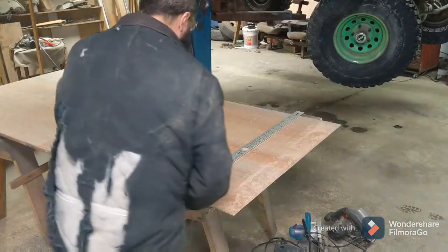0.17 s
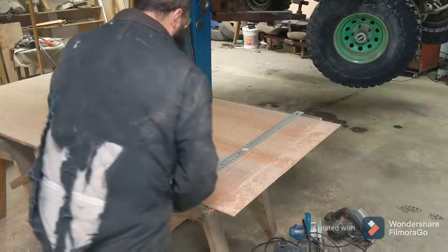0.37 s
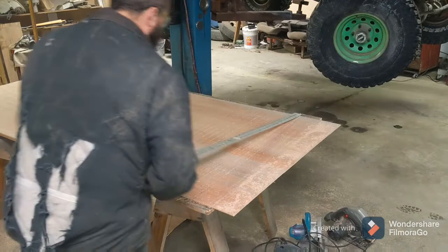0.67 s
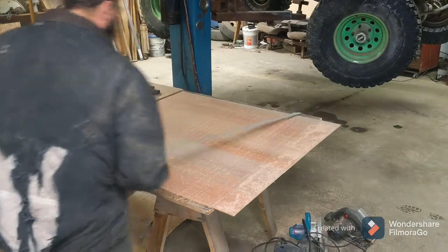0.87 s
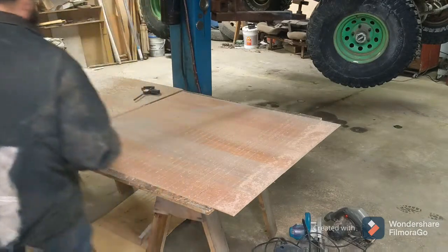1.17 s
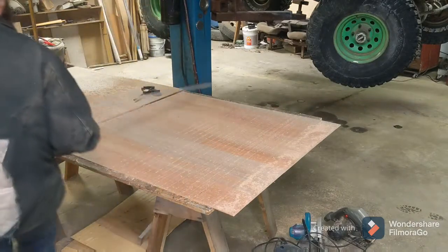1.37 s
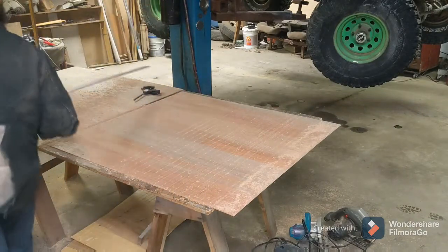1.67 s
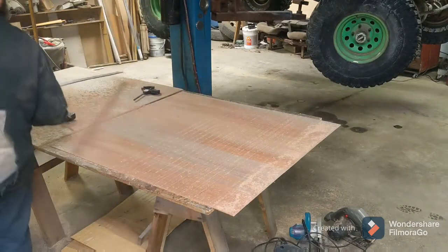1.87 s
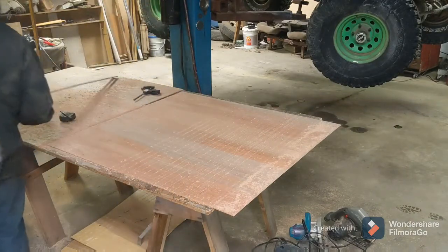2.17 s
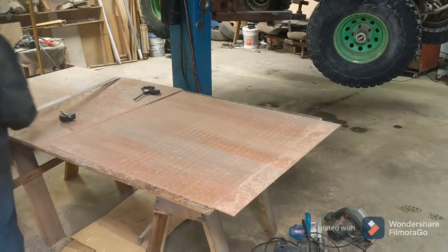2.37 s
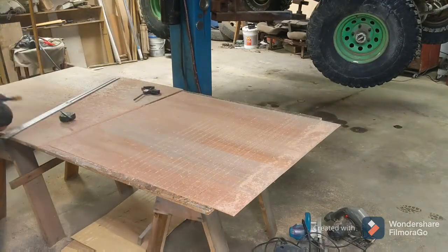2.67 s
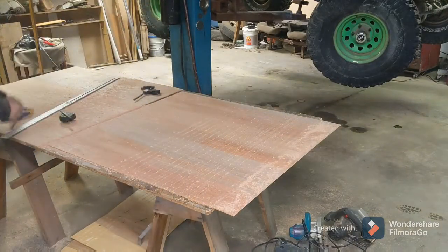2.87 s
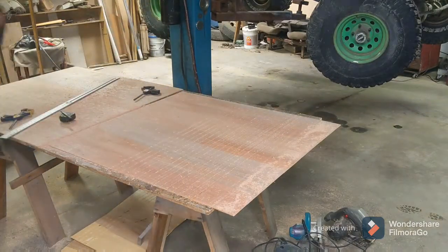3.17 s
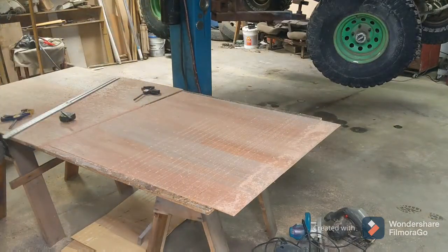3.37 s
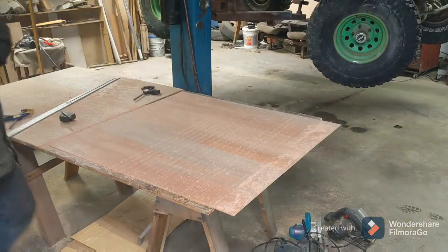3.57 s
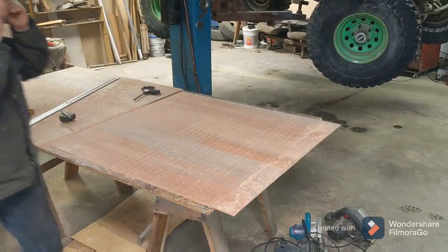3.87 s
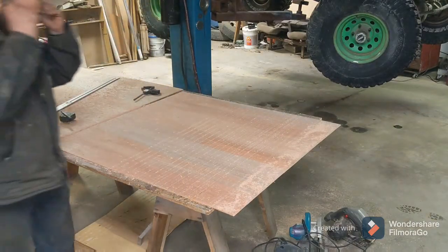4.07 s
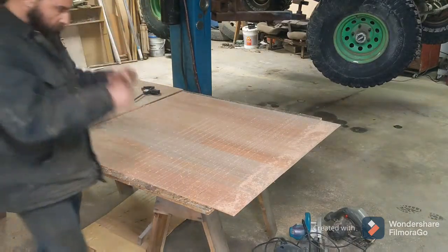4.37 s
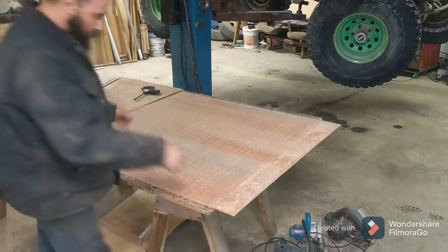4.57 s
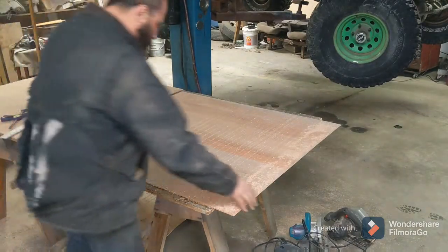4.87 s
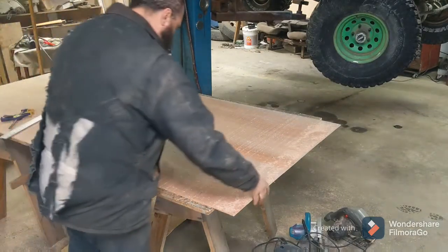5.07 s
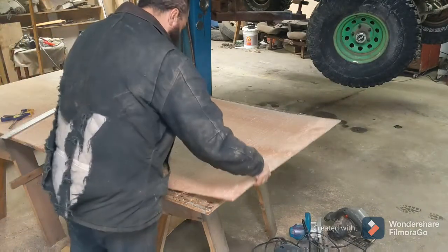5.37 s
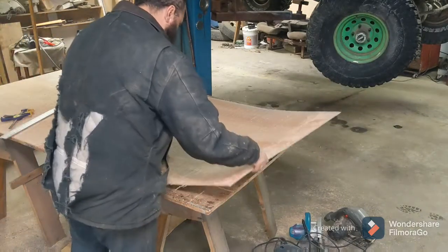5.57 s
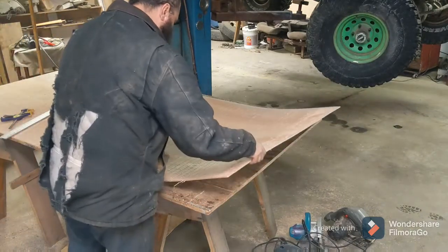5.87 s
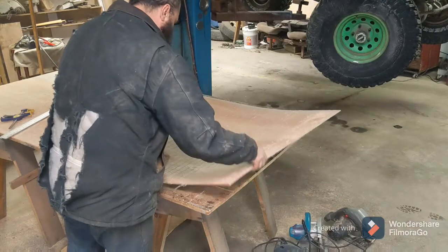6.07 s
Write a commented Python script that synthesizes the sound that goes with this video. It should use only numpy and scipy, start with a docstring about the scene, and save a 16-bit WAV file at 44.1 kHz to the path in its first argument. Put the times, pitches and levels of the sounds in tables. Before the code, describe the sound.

In a reverberant workshop, tools knock down on plywood, a metal straightedge drops with a loud clatter, then wood scrapes jerkily and splinters briefly.

```python
"""Plywood sheet on sawhorses

A thin plywood sheet lies in a workshop. A long metal square is dragged off it, tools are set down, and the
square drops on the far end with a clatter; shoes and sleeves scuff by. Then the gripped sheet scrapes in jerks
and crackles as it bends, over a faint hum. Knocks are filtered pulses with noise rings and bending modes, clatter
is random touches ringing metal modes, friction is coloured grains; all but the air and the hum get echoes and reverb.
"""
import sys
import numpy as np
from scipy import signal
from scipy.fft import rfft, irfft
from scipy.io import wavfile

SR = 44100
rng = np.random.default_rng(int(sys.argv[2]) if len(sys.argv) > 2 else 0)


def wav_out(sig):
    """Save sig, one row per channel (or a flat mono array), as 16-bit PCM at SR to the path in sys.argv[1]."""
    wavfile.write(sys.argv[1], SR, np.round(np.clip(np.atleast_2d(sig).T, -1, 1) * 32767).astype(np.int16))


N = 273596
TIME = np.arange(N) / SR
RING_TIME = TIME[:SR * 3 // 4]

# jerks of the gripped sheet, an edge knock and a rasp each: (t/s, knock level/dB, rasp level/dB)
TUGS = [(4.995, -3.5, -29.5), (5.031, -2.5, -34.5), (5.071, -8, -31.5), (5.139, -1, -30.5),
        (5.168, -5, -31), (5.211, -1, -35), (5.265, -9, -39)]


def from_db(db):
    """Decibels to gain."""
    return 10 ** (np.asarray(db) / 20)


def unit_energy(x):
    """Scale so that the squares of a channel sum to one, on average over the channels."""
    return x / np.sqrt(np.mean(np.sum(x ** 2, axis=-1)) + 1e-20)


def at_hz(points, hz):
    """Read a table on a log-frequency axis."""
    f, value = np.transpose(points)
    return np.interp(np.log(np.maximum(hz, 1)), np.log(f), value)


def add(track, s, sound):
    """Mix a sound into a track from time s on."""
    start = max(round(s * SR), 0)
    track[start:start + len(sound)] += sound[:N - start]


def colour(x, points, tilt_db=0, size=4096):
    """Causal (minimum-phase) filter that follows a spectrum, tilted per octave above 1 kHz."""
    hz = np.maximum(np.fft.rfftfreq(size, 1 / SR), 1)
    octaves = np.log2(np.maximum(hz, 1000) / 1000)
    cepstrum = irfft(np.log(from_db(at_hz(points, hz) + tilt_db * octaves)))
    # folding the cepstrum forward gives minimum phase
    cepstrum[1:size // 2] *= 2
    cepstrum[size // 2 + 1:] = 0
    impulse = irfft(np.exp(rfft(cepstrum)))
    return signal.oaconvolve(x, impulse)[:len(x)]


def dying(t60):
    """Envelope that loses 60 dB in t60 seconds."""
    return np.exp(-np.log(1000) * RING_TIME / t60)


def ring(modes, spread_db):
    """Struck modes decay as sines; their random strengths stand for where the blow lands."""
    gains = from_db(spread_db * rng.standard_normal(len(modes))) * rng.choice([-1, 1], len(modes))
    total = np.zeros(len(RING_TIME))
    for gain, (hz, db, t60) in zip(gains, modes):
        total += gain * from_db(db) * dying(t60) * np.sin(2 * np.pi * hz * RING_TIME)
    return unit_energy(total)


def grains(per_s, spread_db, size):
    """Tiny random contacts of uneven strength, rms 1."""
    excess = np.minimum(rng.exponential(1, size), 4)   # capped so that no grain sticks out
    strength = from_db(spread_db * excess) * rng.choice([-1, 1], size)
    happens = rng.random(size) < per_s / SR
    return unit_energy(strength * happens) * np.sqrt(size)


def stroke(start_s, length_s, level_db, swell_db, attack_s, fade_s):
    """Envelope of a push: it gets going, swells or slackens while it lasts, then fades."""
    t = TIME - start_s
    held = from_db(level_db + swell_db * np.clip(t / length_s, 0, 1))
    return held * np.clip(t / attack_s, 0, 1) * np.exp(-np.maximum(t - length_s, 0) / fade_s)


def diffuse(size):
    """White stereo noise arriving from all sides: alike in the bass, nearly unrelated in the top treble."""
    # left-right likeness: (f/Hz, correlation)
    likeness = [(140, 0.98), (260, 0.43), (600, 0.072), (1100, 0.26), (2000, 0.027), (16000, -0.061)]
    alike = np.clip(at_hz(likeness, np.fft.rfftfreq(size, 1 / SR)), -1, 1)
    mid, side = rfft(rng.standard_normal((2, size)))
    left_right = np.sqrt((1 + alike) / 2) * mid + np.sqrt((1 - alike) / 2) * side * [[1], [-1]]
    return irfft(left_right, size)


def workshop(build_s, count=16):
    """Stereo reverberation that builds up quickly and dies band by band."""
    # reverberation time of the workshop: (f/Hz, t60/s)
    room_t60 = [(100, 0.62), (300, 0.58), (1000, 0.37), (3000, 0.48), (6000, 0.51), (10000, 0.33),
                (16000, 0.26)]
    size = len(RING_TIME)
    field, hz = rfft(diffuse(size)), np.fft.rfftfreq(size, 1 / SR)
    edges, tail = np.r_[0, np.geomspace(100, SR / 2, count)], 0
    for low, high in zip(edges, edges[1:]):
        band = irfft(field * ((hz >= low) & (hz < high)), size)
        envelope = dying(at_hz(room_t60, (low + high) / 2)) * (1 - np.exp(-RING_TIME / build_s))
        tail = tail + unit_energy(band * envelope) * np.sqrt(high - low)   # equal power per Hz
    return unit_energy(tail)


def place(x, room, wet_db, lag_s):
    """Direct sound and early echoes, lagging by lag_s on the right, plus reverb in a level-balanced mix."""
    # early echoes off floor, wall and ceiling: (delay/s, level/dB)
    echoes = [(.0048, -14), (0.0131, -18.5), (0.029, -11)]
    near = x + sum(from_db(db) * np.interp(TIME - delay_s, TIME, x, left=0) for delay_s, db in echoes)
    direct = np.array([near, np.interp(TIME - lag_s, TIME, near)])
    wet = from_db(wet_db)
    reverb = signal.oaconvolve(x[None], room, axes=1)[:, :N]
    return (direct + wet * reverb) / np.hypot(1, wet)


def spread_out(source, rooms, wet_db, lag_s):
    """A long object sounds from several spots: fresh draws of it, each through its own reverberation."""
    return sum(place(source(), room, wet_db, lag_s) for room in rooms) / np.sqrt(len(rooms))


def background(air_db=-52, hum_db=-64.5, hum_hz=120):
    """Low rumble and soft hiss as coloured diffuse noise, with mains hum as one steady sine."""
    # the quiet workshop: (f/Hz, density/dB per Hz)
    air_colour = [(15, -3.5), (30, 5), (50, -4.5), (76, -2), (100, -15.5), (155, -10.5), (200, -15),
                  (300, -15), (800, -18.5), (2100, -24), (4000, -20), (8000, -34.5), (12000, -39.5),
                  (16000, -40)]
    air = np.array([colour(side, air_colour) for side in diffuse(N)])
    air = unit_energy(air) * np.sqrt(N)   # rms 1
    hum = np.sqrt(2) * np.sin(2 * np.pi * hum_hz * TIME)
    return from_db(air_db) * air + from_db(hum_db) * hum


def scuffs(skew=0.3, hiss_db=1, hiss_q=1.7):
    """A sole or sleeve brushes past: grains with a broad hiss peak, swelling quickly and fading."""
    # shoes and sleeves brushing: (t/s, length/s, level/dB, tilt/dB per octave, hiss centre f/Hz)
    brushes = [(0.114, 0.067, -41.5, 0.5, 5330), (0.741, 0.56, -59, 6, 5700),
               (1.675, 0.15, -52.5, -1.5, 8500), (2.475, 0.12, -49.5, 1, 6000),
               (4.019, 0.068, -45.5, 0, 6700), (4.269, 0.2, -49.5, -1.5, 4400),
               (4.651, 0.16, -43, 0, 12600)]
    # brushing sole: (f/Hz, density/dB per Hz)
    sole = [(100, -3), (330, 14.5), (900, 10), (1900, -3), (3600, 13), (6500, 4.5), (9000, -3), (13000, -4),
            (16000, -19)]
    out = np.zeros(N)
    for s, length_s, level_db, tilt_db, hiss_hz in brushes:
        grit = colour(grains(6000, 2.7, size=len(RING_TIME)), sole, tilt_db)
        hiss = signal.lfilter(*signal.iirpeak(hiss_hz, hiss_q, fs=SR), grit)
        grit = grit + from_db(hiss_db) * hiss
        swell = np.sin(np.pi * np.minimum(RING_TIME / length_s, 1) ** skew)
        add(out, s, from_db(level_db) * unit_energy(grit) * np.sqrt(len(grit)) * swell)
    return out


def rub(envelope, spectrum, per_s, spread_db):
    """Friction: a stream of small slips heard through the rubbed body."""
    slips = colour(grains(per_s, spread_db, size=N), spectrum)
    return envelope * unit_energy(slips) * np.sqrt(N)


def scrapes():
    """The square hisses over the veneer; the dragged sheet rasps in coarse slips with fine grit on top."""
    # pushes of the square over the sheet: (t/s, length/s, level/dB, swell over the push/dB)
    pushes = [(0.098, 0.071, -47.5, -3), (0.193, 0.1, -51.5, 11), (0.702, 0.48, -53.5, -9),
              (1.199, 0.032, -50, -0.5), (2.654, .1, -47.5, 3)]
    # square on veneer: (f/Hz, density/dB per Hz)
    veneer = [(200, -15), (600, 1), (950, 3), (1900, -2), (3400, 2.5), (5700, -2.5), (8000, -13.5),
              (12000, -20), (16000, -21)]
    # coarse rasp of the sheet: (f/Hz, density/dB per Hz)
    rasp_colour = [(60, -23), (140, -3), (300, -19), (480, 7.5), (650, -7), (900, 7.5), (1150, -1),
                   (1500, 4.5), (2100, -10), (4000, -17.5), (9000, -70)]
    # grit under the sheet: (f/Hz, density/dB per Hz)
    grit_colour = [(300, -31), (1400, -5), (2600, 7.5), (4000, 5.5), (5500, -1.5), (8000, -13.5),
                   (11000, -27.5), (15000, -37.5)]
    gentle = dict(attack_s=0.015, fade_s=0.031)
    slide = sum(stroke(*push, **gentle) for push in pushes)
    rasp = sum(stroke(s, .012, db, 0, attack_s=0.0045, fade_s=0.022) for s, _, db in TUGS)
    # a hiss of grit during the tugs, and a faint rub that slackens and outlasts them
    grit = stroke(5.08, 0.18, level_db=-31.5, swell_db=-0.5, attack_s=0.028, fade_s=0.024)
    lift = stroke(4.995, .43, level_db=-44, swell_db=-13, **gentle)
    hiss = rub(slide, veneer, 5000, 2.06)
    return hiss + rub(rasp, rasp_colour, 900, 3.5) + rub(np.hypot(grit, lift), grit_colour, 4000, 5.6)


def crackles():
    """Fibres snap in short, bright showers of grains that die away."""
    # wood fibres letting go as the sheet bends: (t/s, level/dB, decay time/s)
    showers = [(5.814, -9, 0.0016), (5.825, -4.5, 0.025), (5.853, -9, 0.011)]
    # splintering wood: (f/Hz, density/dB per Hz)
    splinter = [(200, -36), (1100, -27), (2550, -20), (3200, -1.5), (3800, 2.5), (4600, -3.5),
                (7000, -10.5), (9500, -16.5), (12000, -25), (16000, -34)]
    out = np.zeros(N)
    for s, level_db, decay_s in showers:
        snaps = grains(600, 5.0, size=len(RING_TIME)) * np.exp(-RING_TIME / decay_s)
        add(out, s, from_db(level_db) * unit_energy(colour(snaps, splinter)))
    return out


def clatters(ring_db=-14, first_touch_db=-15):
    """Metal lands, then buzzes on the wood in random, dwindling touches that set its modes ringing."""
    # metal chattering on the wood: (t/s, level/dB, chatter decay/s, tilt/dB per octave, top f/Hz)
    landings = [(.302, 10, 0.0062, 4, 8500), (.601, -10.5, 0.01, 2.5, 9000),
                (0.7147, -11, 0.0024, 3, 14000), (2.178, -16, .004, 5, 15000),
                (2.229, -7, 0.0082, -3.5, 12000), (2.413, -10.5, .013, -0.5, 12000),
                (2.774, -1, .01, 3, 13000), (2.813, 0.5, .0044, 2, 15000), (3.044, 11, 0.0023, -3, 15000),
                (3.08, 18, 0.0028, -1.5, 13000), (3.09, 18.5, 0.031, -2.5, 11900),
                (3.85, -20, 0.0031, -4, 6160)]
    # ring of the metal square: (f/Hz, level/dB, t60/s)
    square_modes = [(897, -9, .25), (963, 23, 0.24), (1080, -6, .15), (1145, -22, 0.6), (1150, -17, 0.13),
                    (1403, 23.5, 0.076), (2166, 6, .25), (2440, 20, 0.083), (2744, -27, 0.28),
                    (2940, -30, 0.23), (3230, -41, 0.088), (3490, 4, 0.22), (4110, -49, 0.13),
                    (4280, 3.5, 0.083), (4850, 8, 0.26), (5600, -9, 0.27), (6090, -23, 0.18)]
    # metal on wood: (f/Hz, density/dB per Hz)
    metal_colour = [(200, -37), (900, -23), (1800, -5.5), (2700, 0.5), (4000, 4), (5500, -2.5),
                    (7500, -10.5), (10000, -17), (15000, -23)]
    out = np.zeros(N)
    for s, level_db, chatter_s, tilt_db, top_hz in landings:
        touches = unit_energy(grains(900, 5.0, size=len(RING_TIME)) * np.exp(-RING_TIME / chatter_s))
        touches[0] += from_db(first_touch_db)
        ringing = signal.fftconvolve(touches, ring(square_modes, spread_db=10.0))[:len(touches)]
        buzz = unit_energy(colour(touches, metal_colour, tilt_db))
        ringing = unit_energy(colour(ringing, metal_colour, tilt_db))
        top = signal.butter(2, top_hz, fs=SR, output="sos")
        sound = signal.sosfilt(top, buzz + from_db(ring_db) * ringing)
        add(out, s, from_db(level_db) * unit_energy(sound))
    return out


def tap(s, db, hz):
    """A soft contact: its cut-off follows its pitch and its boom follows its strength."""
    cut_per_pitch, ring_db, boom_below_db, boom_hz = 1.83, -1, -3.5, 198
    return s, db, cut_per_pitch * hz, hz, ring_db, db + boom_below_db, boom_hz


def edge_knock(s, db, hz):
    """A hard edge meets the wood: a fixed cut-off, a stronger after-ring and little boom."""
    cut_hz, ring_db, boom_below_db, boom_hz = 2070, 2, -10.5, 200
    return s, db, cut_hz, hz, ring_db, db + boom_below_db, boom_hz


def knocks(slap_s=.016, edge_hz=1070, bounce_db=-3, bounce_loss_db=8, bounce_hz=910):
    """Every contact as (t/s, clack/dB, cut-off f/Hz, spot f/Hz, after-ring/dB, boom/dB, boom f/Hz)."""
    # hard things landing on the sheet: (t/s, clack level/dB, contact cut-off f/Hz, struck spot f/Hz,
    # after-ring level/dB, boom level/dB, boom centre f/Hz, slap level/dB, slap f/Hz)
    blows = [(.303, 2, 1500, 247, 12.5, 0.5, 148, -4, 280),
             (.600, -8.5, 2400, 2240, 6, -1.5, 161.6, -4, 412),
             (2.228, 0, 1600, 970, 1, -3.5, 150, -13, 348),
             (2.413, -7, 1385, 920, -2.5, -5, 130, -16.5, 483),
             (2.7758, 10, 1090, 527, 5.5, 4, 300, 9.5, 310), (2.784, 9, 1640, 1380, -1, 16, 145, 2.5, 655),
             (2.838, 2.5, 1100, 790, -2.5, 3.5, 130, -10, 300),
             (3.043, 10, 1500, 955, 16, -0.5, 300, -3.5, 900),
             (3.081, 15, 2200, 845, 2.5, 9.5, 164, 10.5, 1350)]
    # soft taps and thuds, of hands on the sheet and a footstep: (t/s, level/dB, f/Hz)
    soft_thuds = [(.110, -11.5, 420), (.1596, -11, 500), (.198, -19.5, 280), (1.012, -23, 210),
                  (1.029, -17, 219), (2.494, -13.5, 336), (4.021, -21, 250), (4.656, -17.5, 303),
                  (4.852, -14.5, 417)]
    # the dropped square rocking to rest: (t/s)
    bounces = [3.22, 3.285, 3.411]
    # small dry ticks of the wood: (t/s, level/dB)
    ticks = [(3.851, -23.5), (5.817, -23)]
    rows = []
    for s, *blow, slap_db, slap_hz in blows:
        # after a blow the sheet slaps back on the board below
        rows += [(s, *blow), tap(s + slap_s, slap_db, slap_hz)]
    rows += [tap(*row) for row in soft_thuds]
    # each bounce is weaker than the last
    rows += [edge_knock(s, bounce_db - bounce_loss_db * k, bounce_hz) for k, s in enumerate(bounces)]
    return rows + [edge_knock(s, db, edge_hz) for s, db, *_ in TUGS + ticks]


def booms(swell_s=0.0099, narrow_db=7):
    """Slow bending waves follow each contact; where it lands decides which modes answer most."""
    # bending modes of the sheet: (f/Hz, level/dB, t60/s)
    sheet_modes = [(52, -9, 0.71), (72.9, -6.5, 0.43), (120, 4, 0.27), (144.3, 7, 0.075), (172, 0.5, 0.092),
                   (180.4, -4, 0.22), (217.3, -3.5, 0.2), (260.6, 2.5, 0.19), (303.5, 12, 0.064),
                   (324, -16.5, 0.044), (373, -38, 0.11), (470, -2.5, 0.15), (516, 24.5, 0.043)]
    out = np.zeros(N)
    for s, *_, boom_db, boom_hz in knocks():
        # modes answer less the further they lie from the boom's centre
        answering = [(hz, db - narrow_db * np.log2(hz / boom_hz) ** 2, t60) for hz, db, t60 in sheet_modes]
        boom = ring(answering, spread_db=3.0) * (1 - np.exp(-RING_TIME / swell_s))
        add(out, s, from_db(boom_db) * unit_energy(boom))
    return out


def clacks(clack_t60=0.072, spot_db=6, spot_q=4):
    """A pulse, and decaying noise for the crowded, quickly damped upper modes of the struck wood."""
    # clack of the wood: (f/Hz, density/dB per Hz)
    clack_colour = [(60, -13.5), (150, -3), (300, -1), (550, -0.5), (900, 0), (1500, -0.5), (2000, -4.5),
                    (3500, -1), (9000, -18)]
    out = np.zeros(N)
    for s, clack_db, contact_hz, spot_hz, ring_db, _, _ in knocks():
        upper = from_db(ring_db) * unit_energy(rng.standard_normal(len(RING_TIME)) * dying(clack_t60))
        upper[0] -= 1   # the pulse
        # the struck spot and what lands on it share one resonance, stronger the more freely they ring
        spot = signal.lfilter(*signal.iirpeak(spot_hz, spot_q, fs=SR), upper)
        upper = upper + from_db(spot_db + ring_db) * spot
        # a soft contact lasts longer and leaves out the treble
        soft = signal.butter(2, contact_hz, fs=SR, output="sos")
        clack = signal.sosfilt(soft, colour(upper, clack_colour))
        add(out, s, from_db(clack_db) * unit_energy(clack))
    return out


def scene(count=4):
    """All sources share one workshop; wood, metal and scuffs reach the left first, the rest both sides at once."""
    rooms = [workshop(build_s=0.00028) for _ in range(count)]
    scuffing = place(scuffs(), rooms[3], wet_db=7.5, lag_s=.0001)
    scraping = place(scrapes(), rooms[2], wet_db=4.0, lag_s=0)
    fibres = spread_out(crackles, rooms, wet_db=6.5, lag_s=0)
    metal = spread_out(clatters, rooms, wet_db=12.0, lag_s=0.00014)
    wood = place(booms(), rooms[1], wet_db=-9, lag_s=.0001)
    wood = wood + place(clacks(), rooms[0], wet_db=-3.0, lag_s=0.000079)
    return background() + scuffing + scraping + fibres + metal + wood


def record(dry, cutoff_hz=15750):
    """Two unlike microphone ports with treble resonances; peaks clip and the top is cut."""
    # microphone response: (f/Hz, level/dB)
    mic = [(1000, -0.5), (4200, -4), (5000, -4.5), (5750, 5), (6600, -1.5), (7700, 6.5), (8700, 4.5),
           (10000, 8.5), (11000, 3.5), (12000, 10), (13500, 3)]
    # left port over right port: (f/Hz, level difference/dB)
    left_lift = [(100, 1), (260, -1), (500, 3), (1000, 2), (2000, -0.5), (4000, 1.5), (8000, 2),
                 (13000, 10.5)]
    ports = []
    for x, side in zip(dry, (1, -1)):
        half_lift = [(hz, side * db / 2) for hz, db in left_lift]
        ports.append(colour(colour(x, mic), half_lift))
    steep = signal.ellip(10, .2, 80, cutoff_hz, fs=SR, output="sos")
    return signal.sosfilt(steep, np.clip(ports, -1, 1))


dry = scene()
out = record(dry)
wav_out(out)
```